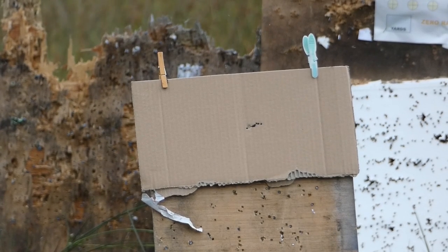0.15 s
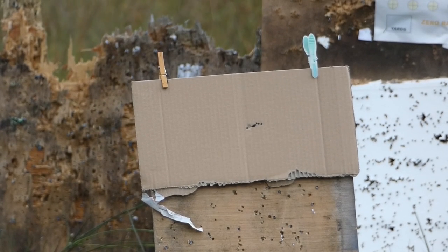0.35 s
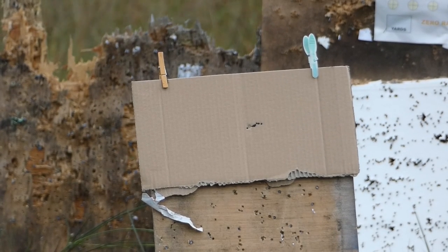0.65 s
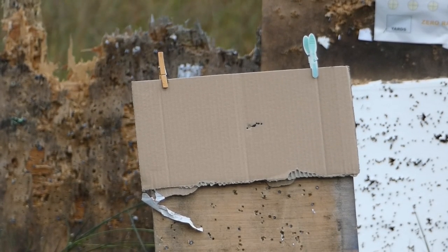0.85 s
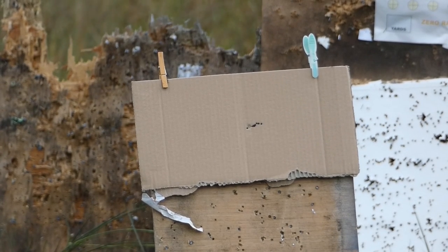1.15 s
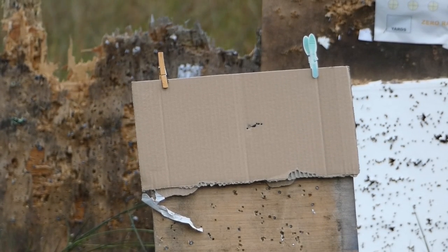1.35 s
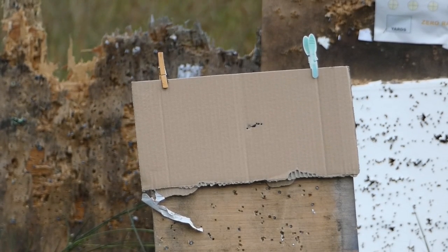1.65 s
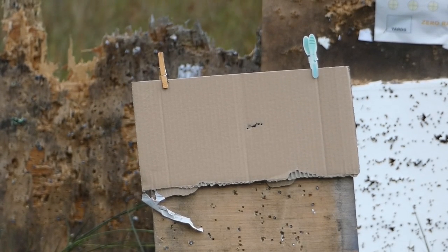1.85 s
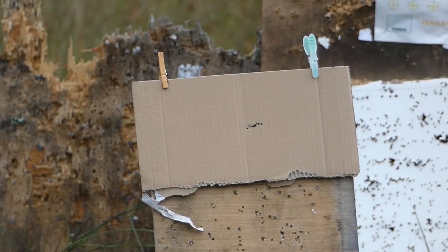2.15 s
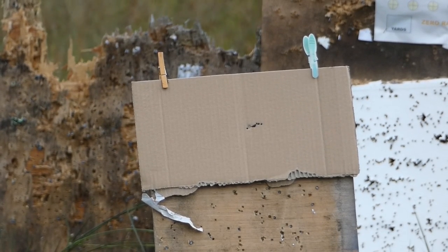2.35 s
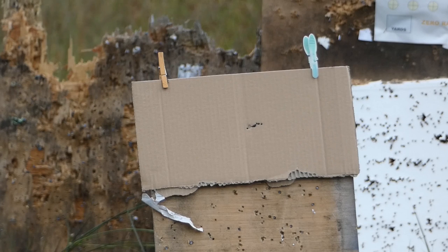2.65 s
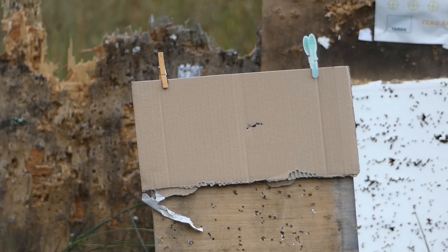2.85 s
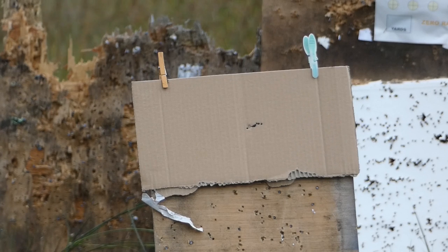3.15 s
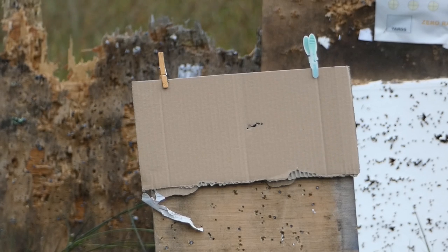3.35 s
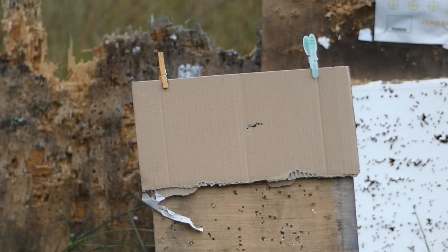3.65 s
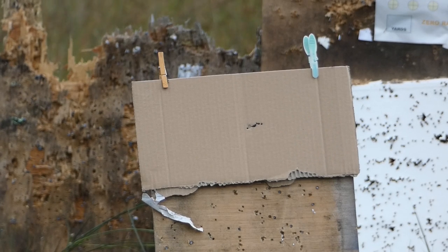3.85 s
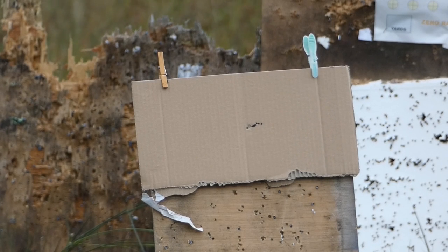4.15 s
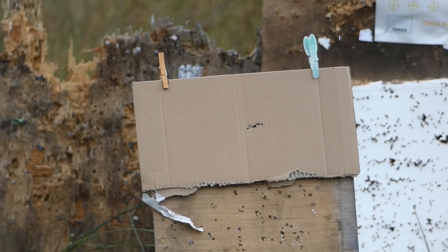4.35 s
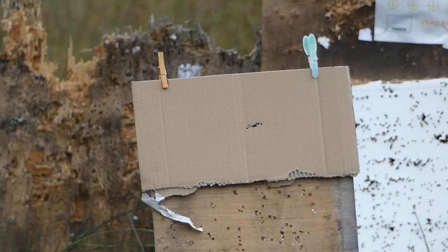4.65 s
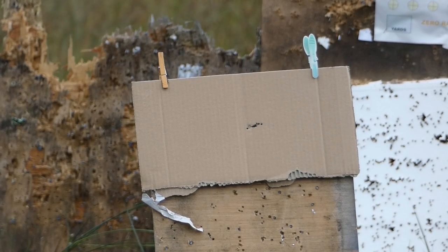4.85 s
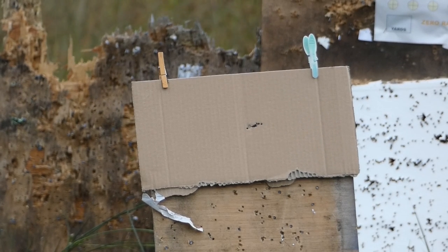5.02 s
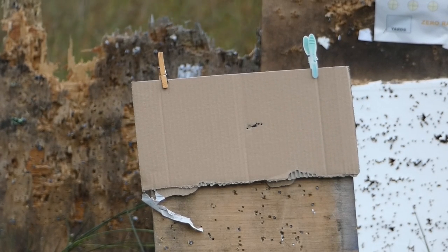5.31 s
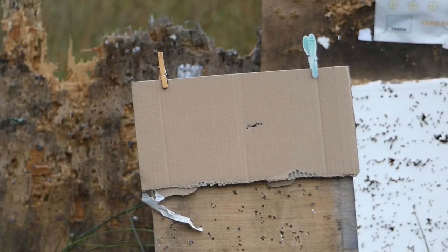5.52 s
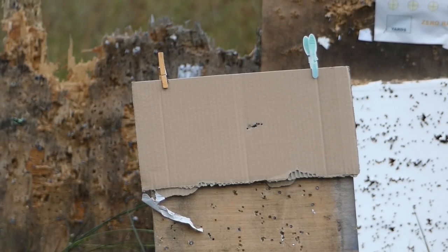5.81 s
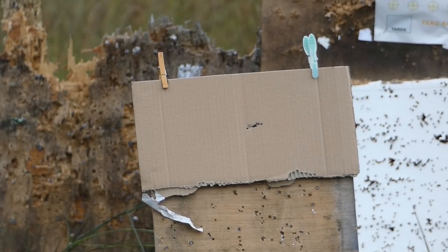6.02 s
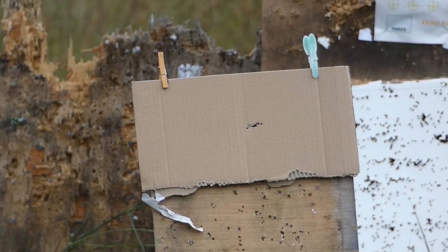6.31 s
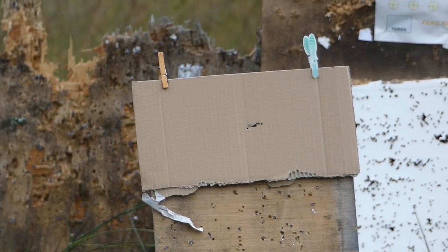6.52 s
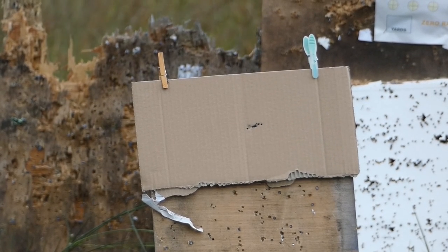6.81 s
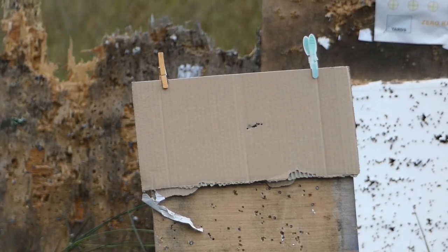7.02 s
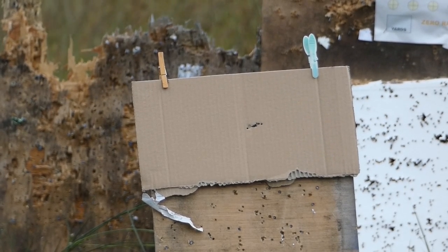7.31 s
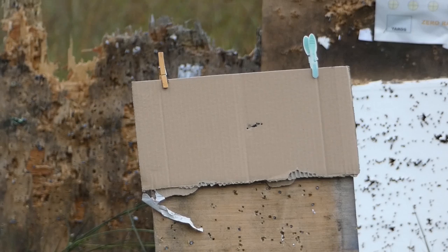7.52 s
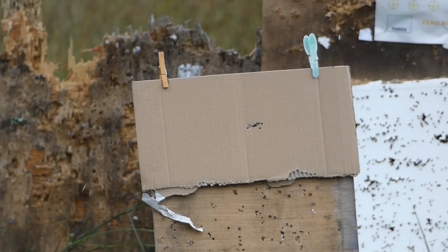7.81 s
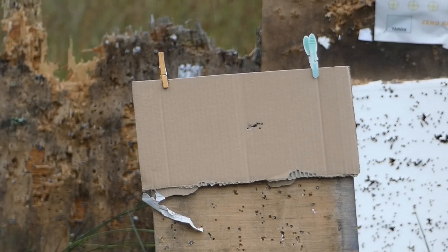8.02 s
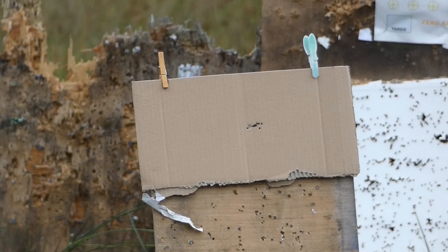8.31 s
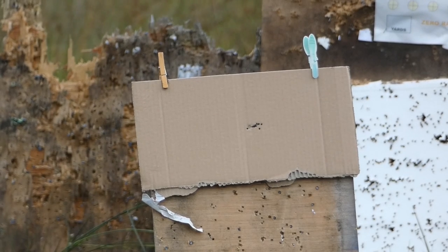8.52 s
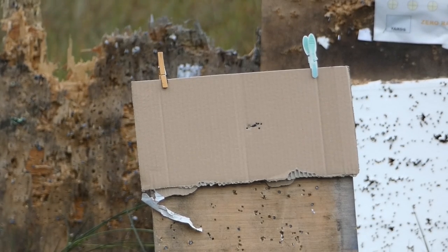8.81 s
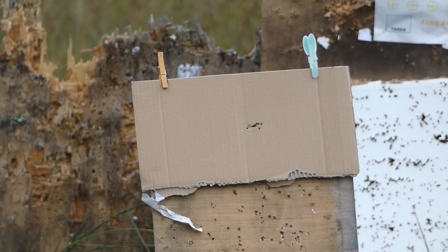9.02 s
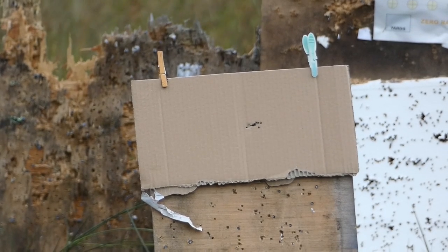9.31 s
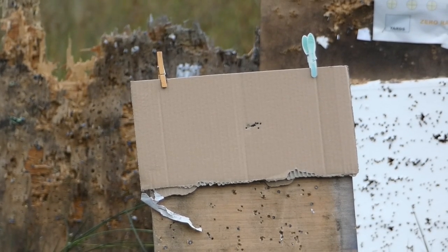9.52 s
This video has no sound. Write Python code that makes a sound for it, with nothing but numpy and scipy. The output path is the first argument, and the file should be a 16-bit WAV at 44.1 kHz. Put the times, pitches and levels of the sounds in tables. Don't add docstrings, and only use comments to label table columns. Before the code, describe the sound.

Three dry air rifle cracks about four seconds apart, each followed quickly by a small metallic pellet strike and fading echoes. Between them come two close mechanical reloads: handle clack, short gritty scrape, ratchety clicks, hard bright lock. A neighbour's shots thud dully far off during the second reload. Soft far traffic and leaves sit underneath, dipping after shots; low gusts thump the microphone before the third shot and heavily at the end.

```python
import sys
import numpy as np
from scipy import signal
from scipy.io import wavfile
from scipy.ndimage import uniform_filter1d

SR = 44100
rng = np.random.default_rng(int(sys.argv[2]) if len(sys.argv) > 2 else 0)


def ratio_of_db(decibels):
    return 10 ** (np.asarray(decibels, float) / 20)


def master(y):
    cut = np.clip(np.atleast_2d(y).T, -1, 1)
    pcm = np.round(cut * 32767)
    wavfile.write(sys.argv[1], SR, pcm.astype(np.int16))


N = 426443


def rms_one(x):
    return x / np.sqrt(np.mean(x ** 2, axis=-1, keepdims=True) + 1e-20)


def at_hz(points, hz):
    points = np.array(points)
    return np.interp(np.log(hz), np.log(points[:, 0]), points[:, 1])


def drift(rate_hz):
    r = np.exp(-40 * np.pi * rate_hz / SR)
    slow = signal.lfilter([1], [1, -2 * r, r * r], rng.standard_normal(N // 20 + 4002))[4000:]
    return np.interp(np.arange(N) / 20, np.arange(len(slow)), rms_one(slow))


EDGES_HZ = 45 * 2 ** (np.arange(18) / 2)
CENTRES_HZ = np.sqrt(EDGES_HZ[1:] * EDGES_HZ[:-1])


def noise_bank():
    white = rng.standard_normal((2, 2, N))
    bands = []
    for k, (low_hz, high_hz) in enumerate(zip(EDGES_HZ, EDGES_HZ[1:])):
        band = signal.butter(2, [low_hz, high_hz], "band", fs=SR, output="sos")
        bands.append(rms_one(signal.sosfilt(band, white[k % 2])))
    return np.array(bands, dtype=np.float32)


def band_gains(spectrum, extra_db=0):
    gains = ratio_of_db(at_hz(spectrum, CENTRES_HZ) + extra_db) * np.sqrt(CENTRES_HZ)
    return gains / np.sqrt(np.sum(gains ** 2))


def resonate(x, modes):
    out = 0
    for k, (hz, width_hz, level_db) in enumerate(modes):
        r = np.exp(-np.pi * width_hz / SR)
        b = np.sqrt((1 - r * r) / 2) * np.array([1, 0, -1])
        a = [1, -2 * r * np.cos(2 * np.pi * hz / SR), r * r]
        out = out + (-1) ** k * ratio_of_db(level_db) * signal.lfilter(b, a, x)
    return out


def add(out, s, x):
    at = round(s * SR)
    low = max(at, 0)
    high = np.clip(at + x.shape[1], low, N)
    out[:, low:high] += x[:, low - at:high - at]


def burst(bank, gains, modes, rise_s, hold_s, fall_s, tail_db, t60s, grit_db=3.5, side_db=-12,
          tail_side_db=-11, shimmer_db=1.2, size=17000, count=30):
    gains = gains * np.minimum((CENTRES_HZ / 160) ** 2, 1)
    t = np.arange(size) / SR
    start = rng.integers(0, N - size)
    noise = bank[:, :, start:start + size]

    onset = np.clip(t / max(rise_s, 1e-4), 0, 1)
    since = np.maximum(t - rise_s - hold_s, 0)
    rough = rms_one(uniform_filter1d(rng.standard_normal(size), size=count))
    direct = onset * ratio_of_db(grit_db * rough - grit_db) * ratio_of_db(-60 * since / fall_s)
    decay = np.outer(-np.log(1000) / at_hz(t60s, CENTRES_HZ), since).astype(noise.dtype)
    tails = onset * ratio_of_db(tail_db) * np.exp(decay)

    wide = ratio_of_db(side_db - 3.2 * np.clip(np.log2(CENTRES_HZ / 3000), -2, 1))
    dry_hit = np.einsum("cb,bct->ct", np.array([gains, gains * wide], noise.dtype), noise) * direct
    late = np.einsum("bt,bct->ct", (gains[:, None] * tails).astype(noise.dtype), noise)
    late = late * ratio_of_db([[0], [tail_side_db]])

    wander = np.interp(np.arange(size) / 700, np.arange(50), rng.standard_normal(50))
    shimmer = ratio_of_db(shimmer_db * wander)
    rung = resonate(rng.standard_normal(size) * (direct + tails[12] * shimmer), modes)
    rung = np.array([rung, ratio_of_db(side_db) * np.pad(rung, (37, 0))[:size]])
    mid, side = dry_hit + late + rung
    return np.array([mid + side, mid - side]) * np.minimum((size - np.arange(size)) / 2000, 1)


# (full force [s], hold [s], level [dB])
GUSTS = [(0.462, 0.057, -50.5), (0.604, .005, -40), (0.7, 0.029, -53), (4.146, 0.021, -43.5),
         (6.795, 0.019, -42), (6.904, 0.023, -19), (6.945, 0.0075, -15), (7.06, 0.037, -34),
         (7.226, .005, -43.5), (7.347, .005, -40.5), (7.412, 0.078, -41), (8.683, 0.028, -21),
         (8.817, .005, -28), (8.76, 0.2, -32), (8.96, 0.17, -27), (9.224, 0.11, -17.5), (9.456, 0.15, -18)]
GUST_RISE_DB_PER_S, GUST_FALL_DB_PER_S = 447, 294


def gust_force():
    t = np.arange(N) / SR
    out = np.full(N, -120.)
    for s, hold_s, level_db in GUSTS:
        rise_db = GUST_RISE_DB_PER_S * np.maximum(s - t, 0)
        fall_db = GUST_FALL_DB_PER_S * np.maximum(t - s - hold_s, 0)
        out = np.maximum(out, level_db - rise_db - fall_db)
    return out


DUCK_DB, DUCK_HOLD_S, DUCK_RECOVER_DB_PER_S = -14.5, 0.16, 45.5
WIND_DUCK_FROM_DB, WIND_DUCK_SHARE, WIND_DUCK_LAG_S = -31.5, 0.99, 0.087


def ducking():
    t = np.arange(N) / SR
    shots_db = 0
    for opens_s, _, _ in SHOTS:
        recovered_db = DUCK_RECOVER_DB_PER_S * np.maximum(t - opens_s - DUCK_HOLD_S, 0)
        shots_db = shots_db + (t > opens_s) * np.minimum(DUCK_DB + recovered_db, 0)
    r = np.exp(-1 / (WIND_DUCK_LAG_S * SR))
    excess_db = np.maximum(gust_force() - WIND_DUCK_FROM_DB, 0)
    return shots_db - WIND_DUCK_SHARE * signal.lfilter([1 - r], [1, -r], excess_db)


# (frequency [Hz], density [dB per Hz])
AIR = [(18, -63), (30, -9.5), (103, -3), (174, -4.5), (364, -4), (461, -3.5), (988, -8), (1540, -11.5),
       (1720, -12), (6380, -25.5), (7090, -27.5), (7870, -27), (8740, -26), (14800, -48.5), (16000, -47)]
AIR_DB = -52
# (frequency [Hz], likeness [0-1])
AIR_ALIKE = [(60, .1), (300, .2), (1400, .45), (3100, 0.56), (6800, 1), (15000, 0.96)]


def open_air(bank):
    out, colour, together = 0, band_gains(AIR), drift(1.0)
    for k, hz in enumerate(CENTRES_HZ):
        alike = np.clip(at_hz(AIR_ALIKE, hz), 0, 1)
        mid, side = bank[k] * np.sqrt([[1 + alike], [1 - alike]]) / np.sqrt(1 + alike)
        patchy = 1 + .06 * together + .09 * drift(6)
        out = out + colour[k] * patchy * np.array([mid + side, mid - side])
    return ratio_of_db(AIR_DB + ducking()) * out


# (frequency [Hz], density [dB per Hz])
BUFFET = [(18, -60), (30, -42), (69, -1.5), (156, 6.5), (234, 2.5), (352, -9), (386, -14.5), (636, -27.5),
          (1260, -52), (2500, -74.5), (3250, -94), (5500, -120)]
BUFFET_TOP_DB = -22


def buffet(bank):
    gust_db = gust_force()
    gains = band_gains(BUFFET)
    side_db = np.clip(-4 + 3.4 * np.log2(CENTRES_HZ / 250), -14, 1.5)
    mid = np.einsum("b,bt->t", gains[:9], bank[:9, 0])
    side = np.einsum("b,bt->t", (gains * ratio_of_db(side_db))[:9], bank[:9, 1])
    ports = np.roll([mid + side, mid - side], 50000, axis=1)
    dull = signal.sosfilt(signal.butter(3, 600, fs=SR, output="sos"), ports)
    return dull * ratio_of_db(np.minimum(gust_db, BUFFET_TOP_DB) - 4 + 2.3 * drift(22))


# (time [s], peak [dB], pitch [Hz], left-right [dB])
PUFFS = [(0.5, -31.5, 107, 7), (0.606, -21.5, 133, 3), (4.147, -28.5, 141, 1), (6.798, -20, 81.4, 1),
         (6.856, -15.5, 149, -3.5), (6.885, -7.5, 113, -2), (6.919, -6, 101, 0), (6.958, -4, 165, 0),
         (6.999, -29, 172.5, -7), (7.039, -16.5, 138, -3), (7.069, -16.5, 190, -9), (7.413, -17.5, 104, -2),
         (7.445, -23, 99.6, -3), (8.655, -11.5, 133, 4), (8.694, -5.5, 161, -3), (8.749, -13.5, 124, -3),
         (8.812, -19, 101.8, 0), (8.901, -17, 123, -7), (8.964, -9.5, 132, -2), (9.001, -8, 170, 1),
         (9.039, -12, 143, 5), (9.108, -10.5, 154, -6), (9.179, -14, 124, 4), (9.228, -6, 160.4, 8),
         (9.379, -11.5, 151.6, 0), (9.474, -10.5, 231, 12.5), (9.5, -12, 194, -11), (9.528, -10, 134, 2),
         (9.582, -3.5, 283, -9), (9.625, -10.5, 277, -1),
         (.452, -34, 110, 0), (.468, -39, 210, 0), (.482, -35, 90, 0), (.52, -36, 110, 0),
           (.565, -38, 110, 0), (.645, -36, 110, 0), (.698, -35, 140, 0), (.77, -36, 110, 0),
           (4.112, -34, 105, 0), (4.172, -31, 145, 0), (4.2, -35, 80, 0), (4.22, -34, 110, 0),
           (8.38, -38, 100, 0), (8.45, -38, 110, 0), (8.492, -34, 140, 0), (8.6, -38, 90, 0),
           (8.67, -13, 160, 0), (8.72, -15, 140, 0), (9.07, -15, 170, 0), (9.09, -13, 140, 0),
           (9.238, -9, 160, 0), (9.254, -10, 200, 0), (9.272, -11, 230, 0), (9.298, -12, 250, 0),
           (9.32, -10, 150, 0), (9.338, -12, 200, 0), (9.447, -10, 135, 0), (9.462, -13, 220, 0),
           (9.533, -6, 150, 4), (9.56, -13, 230, 0), (9.601, -7, 185, 5)]
# (time [s], peak [dB], left-right [dB], brightness [dB])
SNAPS = [(6.956, -35, -12, -25), (6.965, -35, -14, -27), (8.692, -25.5, -12.5, -31), (8.727, -34, -18, -19),
         (8.964, -41, -7, -11), (9.023, -30, 16, -21), (9.044, -42, -10, -15), (9.124, -36, -11, -17),
         (9.254, -18.5, -1, -32), (9.271, -35, 0, -4), (9.294, -31, -15, -35), (9.314, -27, -5, -27),
         (9.334, -39, -15, -19.5), (9.447, -30, -7, -12), (9.471, -22, 10.5, -42), (9.495, -27, -10.5, -12),
         (9.527, -26.5, -7, -10.5), (9.562, -23, -4.5, -18), (9.582, -31, -11, 0.5), (9.601, -30, 4, -3),
         (9.611, -39, -14, -17)]


def wind(bank):
    out = buffet(bank)
    for s, peak_db, hz, pan_db in PUFFS:
        cycles = np.arange(-1.2, 1.2, hz / SR)
        phase = rng.uniform(0, 2 * np.pi) + np.array([[0], [rng.normal(0, hz / 260)]])
        puff = np.exp(-(cycles / 0.52) ** 2) * np.cos(2 * np.pi * cycles + phase)
        add(out, s - 1.15 / hz, ratio_of_db(peak_db - 6.5) * puff * ratio_of_db([[pan_db / 2], [-pan_db / 2]]))
    low_band = signal.butter(3, [280, 620], "band", fs=SR, output="sos")
    high_band = signal.butter(3, [700, 1500], "band", fs=SR, output="sos")
    for s, peak_db, pan_db, bright_db in SNAPS:
        eddy = rng.standard_normal((2, 1500)) * np.pad(np.hanning(750), (0, 750))
        snap = signal.sosfilt(low_band, eddy) + ratio_of_db(bright_db + 2.5) * signal.sosfilt(high_band, eddy)
        add(out, s - .005, ratio_of_db(peak_db + 8) * snap * ratio_of_db([[pan_db / 2], [-pan_db / 2]]))
    return out


# (time [s], peak [dB], treble [dB], rise [s])
FAR = [
    (4.829, -42, -1.5, 0.01),
    (6.0225, -29.5, -1.5, 0.00077),
]
# (frequency [Hz], density [dB per Hz])
BOOM = [(35, -48), (60, -9), (233, -1), (338, -4.5), (593, -2.5), (682, -19), (767, -5), (1250, -13),
        (4970, -18), (9790, -32.5), (16000, -57)]
# (frequency [Hz], T60 [s])
FIELD_T60 = [(200, 0.86), (1000, 0.47), (4000, 0.35), (12000, 0.11)]


def neighbour(bank):
    out = np.zeros((2, N))
    for s, peak_db, treble_db, rise_s in FAR:
        colour = band_gains(BOOM, treble_db * np.clip(np.log2(CENTRES_HZ / 1000), 0, 3))
        boom = burst(bank, colour, [(460.0, 94, -21.0)], rise_s, 0.017, 0.054, 4.45, FIELD_T60,
                     side_db=-13, size=30000)
        add(out, s, ratio_of_db(peak_db) * boom)
    return out


# (frequency [Hz], T60 [s])
NEAR_T60 = [(200, 0.48), (1000, 0.41), (4000, 0.44), (12000, 0.29)]
# (time [s], length [s], level [dB], early whistle [dB], late whistle [dB])
SLIDES = [
    (1.389, 0.27, -63, -21, -12),
    (1.605, 0.043, -27, -3.5, -2.5),
    (5.22, 0.2, -62, -40, -40),
    (5.414, 0.051, -27, -6.5, -3.5),
]
# (frequency [Hz], density [dB per Hz])
SCRAPE = [(59, -40), (100, -3), (156, 4), (335, -22.5), (492, -12.5), (891, -10), (3120, -4), (4770, -4.5),
          (5300, 4), (8280, -16.5), (10700, -10.5), (14700, -26), (16000, -48)]
# (frequency [Hz], width [Hz], level [dB])
STOCK = [(493, 13, -11), (190, 12, -22.5), (5140, 120, -12), (5410, 80, -13), (3190, 220, -10),
         (2720, 60, -17), (3910, 120, -14), (4480, 70, -16), (6120, 70, -16), (6780, 70, -17),
         (8730, 90, -20)]
# (frequency [Hz], width [Hz], level [dB])
WHISTLE = [(10500, 300, 0), (14000, 600, -13)]


def slide(bank):
    out, colour = np.zeros((2, N)), band_gains(SCRAPE)
    for s, length_s, level_db, early_db, late_db in SLIDES:
        scrape = burst(bank, colour, STOCK, 0.006, 0.7 * length_s, 0.089, -4.5, NEAR_T60, count=90)
        add(out, s, ratio_of_db(level_db - 3.8) * scrape)
        early = burst(bank, 0 * colour, WHISTLE, 0.0046, length_s, 0.071, -24.0, NEAR_T60, size=12000)
        add(out, s, ratio_of_db(level_db + early_db) * early)
        late = burst(bank, 0 * colour, WHISTLE, .003, 0.29 * length_s, 0.047, -17, NEAR_T60, size=12000)
        add(out, s + .55 * length_s, ratio_of_db(level_db + late_db + .8) * late)
    return out


# (time [s], peak [dB], ring [Hz], part)
CLICKS = [(1.039, -48, 1460, "handle"), (1.132, -14, 2740, "handle"), (1.241, -28.5, 2050, "handle"),
          (1.5541, -43, 6800, "nudge"), (1.567, -25, 9300, "catch"), (1.608, -16.5, 6300, "tooth"),
          (1.617, -18, 5200, "tooth"), (1.631, -18, 3500, "tooth"), (1.638, -18, 10500, "tooth"),
          (1.71, -36, 5000, "catch"), (1.7552, -20.5, 5300, "stop"), (1.8566, -31.5, 1510, "lever"),
          (1.946, -33, 1400, "stock"), (1.965, -50, 5000, "nudge"), (2.0084, -31, 3070, "lever"),
          (2.0407, -41, 4840, "nudge"), (2.242, -37.5, 6500, "catch"), (2.2597, -12, 5530, "lock"),
          (2.492, -46, 4000, "safety"), (2.9633, -39, 1870, "safety"), (5.02, -45, 2310, "handle"),
          (5.0826, -15, 2740, "handle"), (5.1769, -22, 1900, "handle"), (5.371, -47, 6530, "nudge"),
          (5.3812, -27, 3360, "catch"), (5.4173, -17, 5180, "tooth"), (5.4248, -18, 5180, "tooth"),
          (5.4477, -17, 10500, "tooth"), (5.457, -20, 10500, "tooth"), (5.502, -28, 2510, "stop"),
          (5.5284, -14, 5300, "stop"), (5.544, -16.5, 4100, "tooth"), (5.546, -23, 1450, "stock"),
          (5.5777, -31, 910, "catch"), (5.645, -27.5, 3090, "lever"), (5.6692, -35, 5000, "lever"),
          (5.694, -37, 3130, "lever"), (5.8278, -44, 6300, "catch"), (5.849, -10, 5530, "lock"),
          (6.2566, -37.5, 2030, "safety")]
PARTS = {"nudge": (6.7, -6, -21, .003), "handle": (-5, -5.5, -14, .004), "catch": (-5.5, 1.1, -8.5, .0032),
         "stop": (-3, 2.3, -19.5, .0045), "lever": (-1.2, -2, -17, .0032), "stock": (-3, -16, -13, .0032),
         "lock": (-9, 8, -14.5, .0018), "safety": (-1.45, 8.5, -17, .0032),
         "tooth": (-1.5, 1.5, -21, .0015)}
# (frequency [Hz], density [dB per Hz])
LATCH = [(59, -54), (100, -10.5), (461, -16), (721, -7.5), (1450, -5), (1800, -6.5), (2000, -2), (2170, 0),
         (5420, -4.5), (12700, -22.5), (16000, -54.5)]
# (frequency [Hz], width [Hz], level [dB])
ACTION = [(211, 30, -19.5), (3670, 700, -15), (5400, 700, -15.5)]
# (frequency [Hz], width [Hz], level [dB])
LEVER_MODES = [(775, 45, -18), (1080, 120, -13), (1740, 110, -8), (2570, 40, -7), (2740, 70, -3),
               (3700, 90, -13), (4150, 60, -12), (4450, 60, -13), (4860, 60, -15), (5420, 130, -11),
               (6450, 80, -18)]
# (frequency [Hz], width [Hz], level [dB])
LOCK_MODES = [(2020, 60, -16), (2440, 120, -16), (3360, 120, -15), (4360, 120, -11), (4810, 70, -13),
              (5060, 60, -13), (5820, 90, -13), (6420, 110, -17), (6910, 160, -18), (9000, 80, -19)]


def bolt(bank):
    out = np.zeros((2, N))
    treble = np.clip(np.log2(CENTRES_HZ / 4000), 0, 2)
    for s, peak_db, ring_hz, part in CLICKS:
        ring_db, treble_db, tail_db, rattle_s = PARTS[part]
        colour = band_gains(LATCH, treble * treble_db)
        modes = [(k * ring_hz, .05 * ring_hz, ring_db - 4) for k in (.93, 1, 1.06)] + ACTION
        modes += {"handle": LEVER_MODES, "lock": LOCK_MODES}.get(part, [])
        size = 12000 if part in ("handle", "lock", "stop") else 6000
        hit = burst(bank, colour, modes, 0.00049, rattle_s, .035, tail_db, NEAR_T60, grit_db=2.5, size=size)
        top_hz = min(17000 * ratio_of_db(0.78 * treble_db), .45 * SR)
        hit = signal.sosfilt(signal.butter(2, top_hz, fs=SR, output="sos"), hit)
        add(out, s, ratio_of_db(peak_db - 7.5 + np.array([[.6], [-.6]])) * hit)
    return out


# (time [s], peak [dB], ring [dB], bass [dB], tail [dB], main plate mode [dB])
STRIKES = [
    (.173, -30.5, -5, 9, -11.5, -3),
    (4.542, -28.5, -7.5, 8.5, -14.5, 3),
    (7.793, -21.5, -15, 15.5, -11.5, 0),
]
STRIKE_RISE_S = .0006
BOUNCE_S, BOUNCE_DB, BOUNCE_LOSS_DB, BOUNCE_RISE_S = .0305, -34.5, 9, 0.0019
BOUNCE_RING_DB, BOUNCE_BASS_DB, BOUNCE_TAIL_DB, BOUNCE_WETTER_DB = 10, -2.5, -12.5, 5.5
# (delay [s], peak [dB], tail [dB], rise [s])
RETURNS = [
    (.236, -62, -7.5, 0.016),
    (.301, -62, 3.5, .003),
    (.375, -62, 2, 0.026),
    (.478, -64, 2, 0.012),
]
RETURN_RING_DB, RETURN_BASS_DB = 9.5, 3.5
RETURN_FOLLOWS = 0.51


def impacts(strike):
    at, peak_db, ring_db = strike[:3]
    hits = [(*strike[:5], STRIKE_RISE_S)]
    for k in range(3):
        hits.append((at + BOUNCE_S * (k + 1), BOUNCE_DB - BOUNCE_LOSS_DB * k, ring_db + BOUNCE_RING_DB,
                     BOUNCE_BASS_DB, BOUNCE_TAIL_DB + BOUNCE_WETTER_DB * k, BOUNCE_RISE_S))
    for lag_s, level_db, tail_db, rise_s in RETURNS:
        hits.append((at + lag_s, level_db + RETURN_FOLLOWS * (peak_db + 25), ring_db + RETURN_RING_DB,
                     RETURN_BASS_DB, tail_db, rise_s))
    return hits


# (frequency [Hz], density [dB per Hz])
SMACK = [(180, -55.5), (300, -77), (1100, -14.5), (1530, -2), (3400, 5), (5000, -2.5), (7000, -8),
         (10700, -10), (14200, -31), (16000, -60)]
# (frequency [Hz], width [Hz], level [dB])
TRAP = [(2342, 30, -10), (2476, 20, -5.5), (3149, 40, -7), (3728, 26, 0), (4371, 25, -12), (4517, 25, -10),
        (4870, 24, -1.5), (5373, 30, -9), (5539, 25, -11), (5895, 25, -11), (6476, 20, -5), (7101, 25, -15),
        (7677, 20, -18), (10420, 25, -23), (10990, 16, -19)]
# (frequency [Hz], width [Hz], level [dB])
BOARD = [(1646, 250, -10.5), (3120, 250, -9.5)]
# (frequency [Hz], T60 [s])
TRAP_T60 = [(1000, 0.53), (4000, 0.61), (8000, 0.36), (13000, 0.7)]


def pellet(bank):
    out = np.zeros((2, N))
    bass = np.clip(np.log2(3000 / CENTRES_HZ), 0, 1)
    treble = np.clip(np.log2(CENTRES_HZ / 5000), 0, 2)
    crowd = [(hz, 45, -24) for hz in np.sort(rng.uniform(7800, 14200, 9))]
    for strike in STRIKES:
        at, strike_bass_db, main_db = strike[0], strike[3], strike[5]
        for s, peak_db, ring_db, bass_db, tail_db, rise_s in impacts(strike):
            modes = []
            for hz, width_hz, level_db in TRAP + crowd:
                tilt_db = bass_db * np.log2(4900 / hz) - 4 * max(np.log2(hz / 6600), 0) ** .5
                mode_db = level_db + ring_db - 5 + main_db * (hz == 3728) + rng.normal(0, 1.5) + tilt_db
                modes.append((hz, 1.5 * width_hz, mode_db))
            for hz, width_hz, level_db in BOARD:
                modes.append((hz, width_hz, level_db + .7 * (strike_bass_db - 10) * np.log2(3300 / hz)))
            colour = band_gains(SMACK, bass * bass_db - 4 * (s > at) * treble)
            smack = burst(bank, colour, modes, rise_s, 2 * rise_s, 0.0085, tail_db, TRAP_T60,
                          side_db=-16, tail_side_db=-10, shimmer_db=2.2, size=13000)
            add(out, s, ratio_of_db(peak_db) * smack)
    return out


# (valve opens [s], muzzle blast [s], blast peak [dB])
SHOTS = [
    (-.036, -.029, -11),
    (4.3245, 4.3312, -11),
    (7.5775, 7.5842, -11),
]
# (frequency [Hz], density [dB per Hz])
BLAST = [(35, -40.5), (60, -12), (330, -7), (1010, -12), (1740, -8), (2090, -6.5), (4030, -7.5),
         (4420, -3.5), (6740, -6), (8120, -14.5), (8710, -3), (14900, -19.5), (16000, -30)]
# (frequency [Hz], width [Hz], level [dB])
BARREL = [(387, 60, -25), (750, 68, -10.5), (1740, 300, -3), (4490, 200, -9), (6500, 1000, 2),
          (7040, 80, -10), (8850, 300, -1), (10700, 300, -10), (11400, 150, -10)]
# (frequency [Hz], T60 [s])
BLAST_T60 = [(200, 0.1), (1000, 0.26), (4000, 0.52), (9000, 0.46), (14000, 0.36)]


def rifle(bank):
    out, colour = np.zeros((2, N)), band_gains(BLAST)
    window = np.hanning(190)
    push = np.sin(2 * np.pi * np.linspace(0, 1.5, 190)) * window
    push = push - window * push.sum() / window.sum()
    thump = np.sin(2 * np.pi * 170 * np.arange(700) / SR) * np.hanning(700) * np.ones((2, 1))
    barrel = [(hz, width_hz, level_db - 7.0) for hz, width_hz, level_db in BARREL]
    for opens_s, blast_s, peak_db in SHOTS:
        hiss = burst(bank, colour, BARREL[3:4], 0.0019, blast_s - opens_s + 0.0015, 0.04, -24.5, BLAST_T60)
        add(out, opens_s, ratio_of_db(peak_db - 10.0) * hiss)
        bang = burst(bank, colour, barrel, 0.00057, 0.0026, .02, -36.5, BLAST_T60, side_db=-7.5)
        add(out, blast_s, ratio_of_db(peak_db + 1.3) * bang * ratio_of_db([[-1.5], [1.5]]))
        add(out, blast_s, ratio_of_db(peak_db - 1.5) * np.array([push, push]))
        add(out, blast_s, ratio_of_db(peak_db - 23) * thump)
    return out


def scene():
    bank = noise_bank()
    background = open_air(bank) + wind(bank) + neighbour(bank)
    return background + slide(bank) + bolt(bank) + pellet(bank) + rifle(bank)


MIC_LOW_HZ, MIC_HIGH_HZ = 75, 16200
WIDTH_CUT_HZ, WIDTH_OPENS_DB = 6500, -38


def low_pass(x):
    return signal.sosfilt(signal.butter(12, 16640, fs=SR, output="sos"), x)


def record(dry):
    x = signal.sosfilt(signal.butter(3, MIC_LOW_HZ, "high", fs=SR, output="sos"), dry)
    x = signal.sosfilt(signal.cheby2(10, 50, MIC_HIGH_HZ, fs=SR, output="sos"), np.tanh(x))
    mid, side = (x[0] + x[1]) / 2, (x[0] - x[1]) / 2
    low = signal.sosfiltfilt(signal.butter(6, WIDTH_CUT_HZ, fs=SR, output="sos"), side)
    high = side - low
    loud = np.sqrt(uniform_filter1d(high ** 2, size=1024) + 1e-12) / ratio_of_db(WIDTH_OPENS_DB - 20)
    side = low + high * loud ** 3 / (1 + loud ** 3)
    return low_pass(np.array([mid + side, mid - side]))


dry = scene()
out = record(dry)
master(out)
```